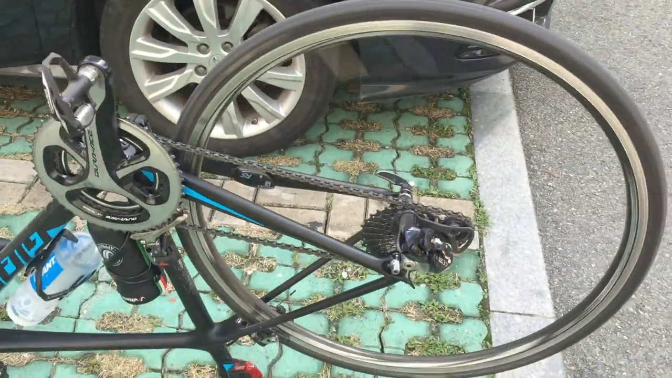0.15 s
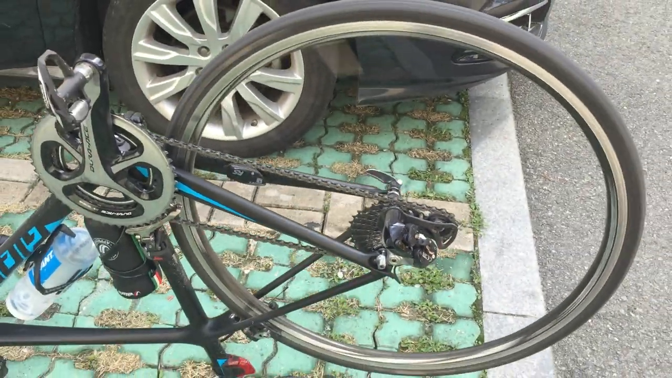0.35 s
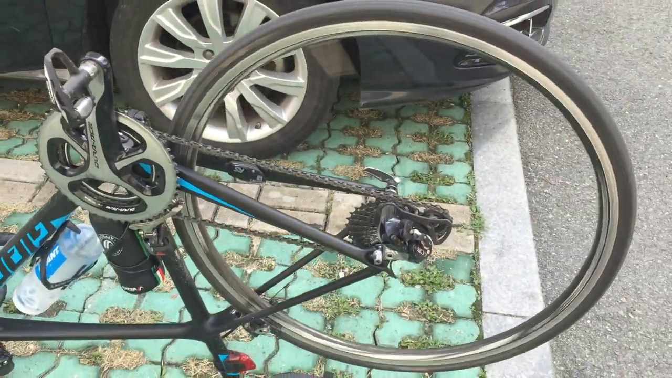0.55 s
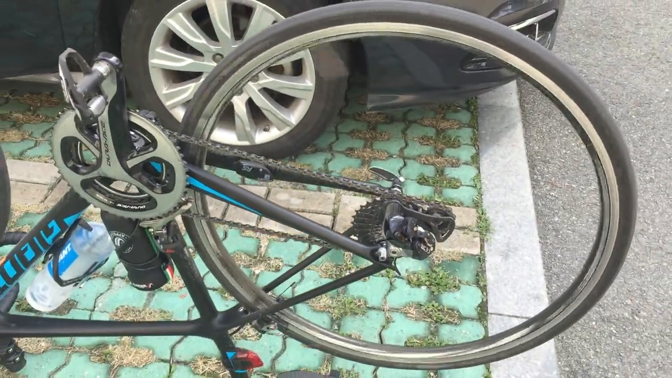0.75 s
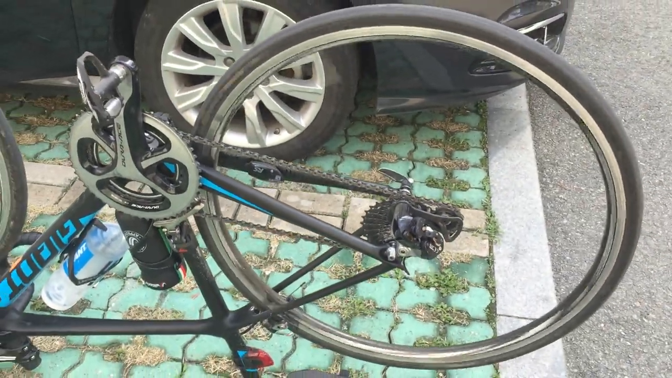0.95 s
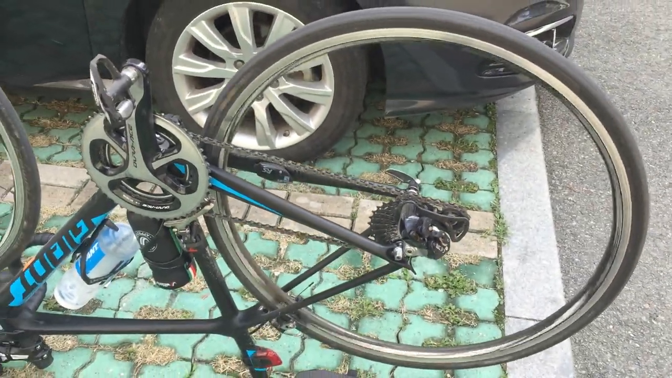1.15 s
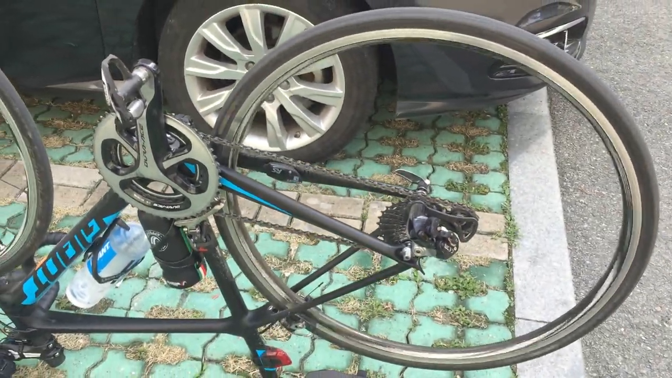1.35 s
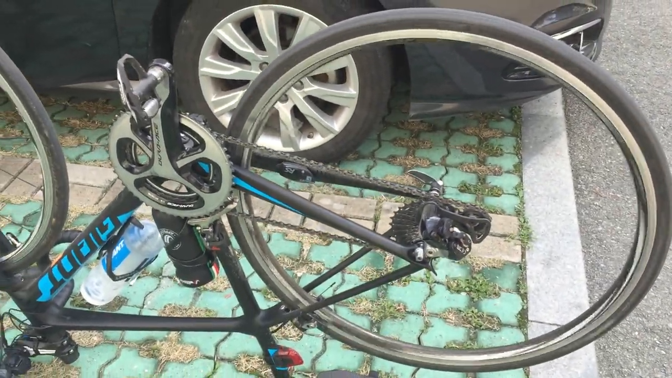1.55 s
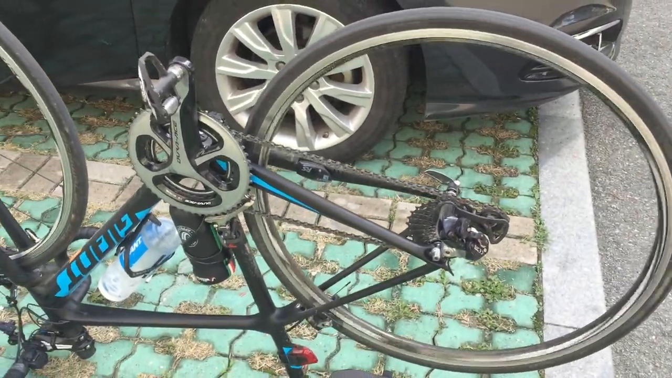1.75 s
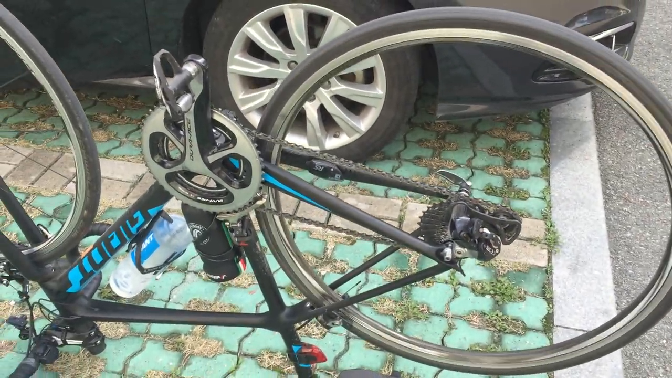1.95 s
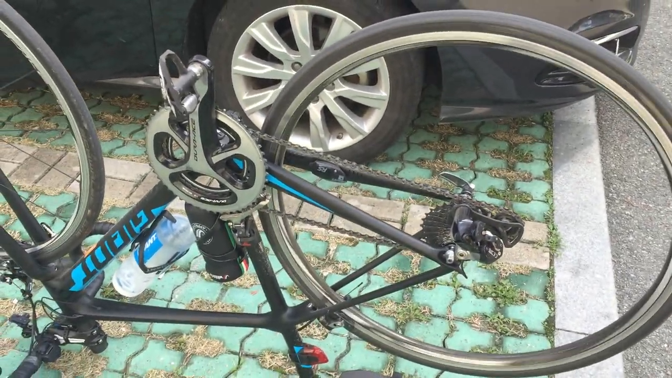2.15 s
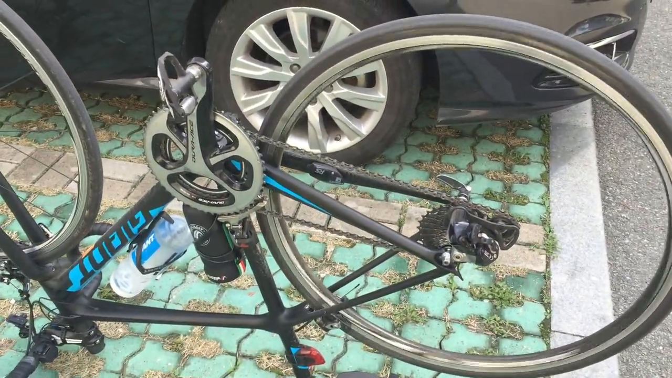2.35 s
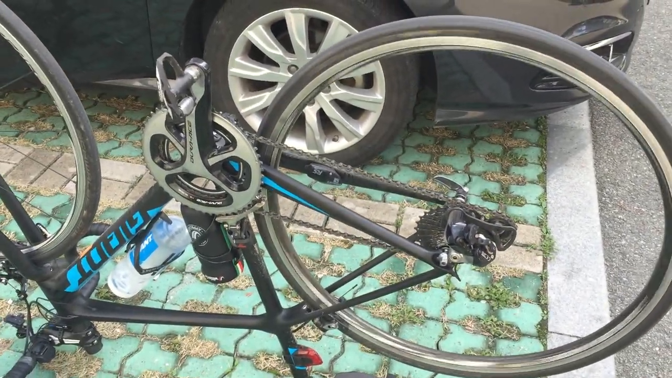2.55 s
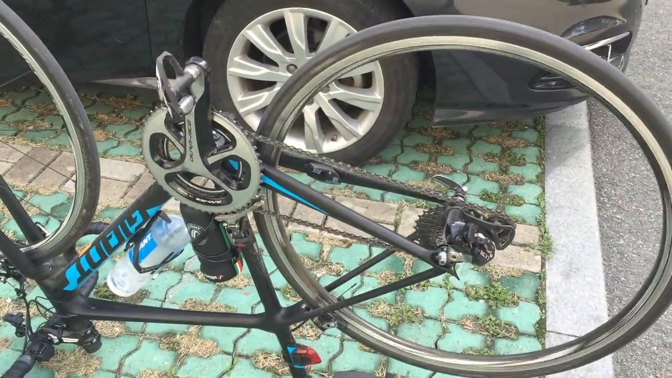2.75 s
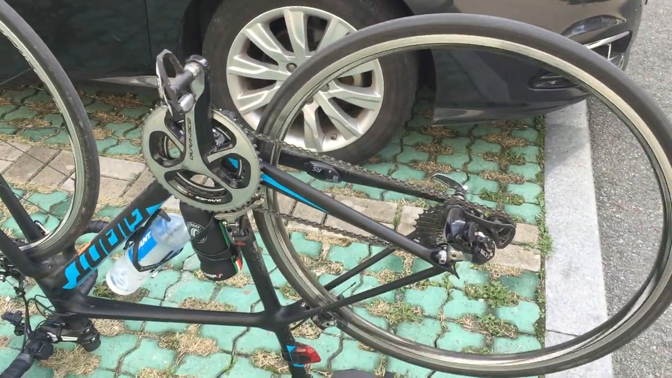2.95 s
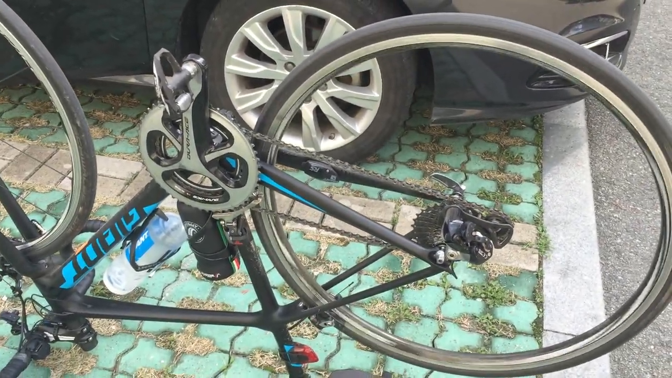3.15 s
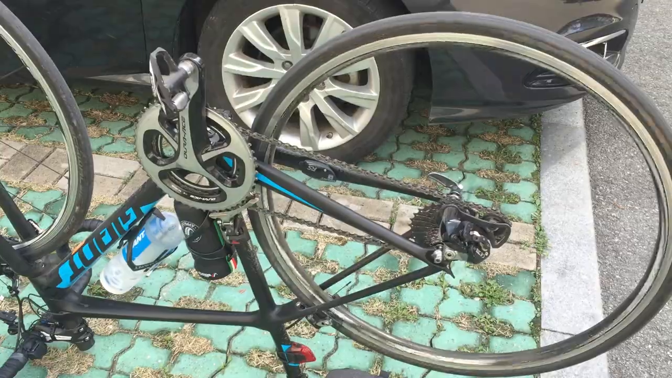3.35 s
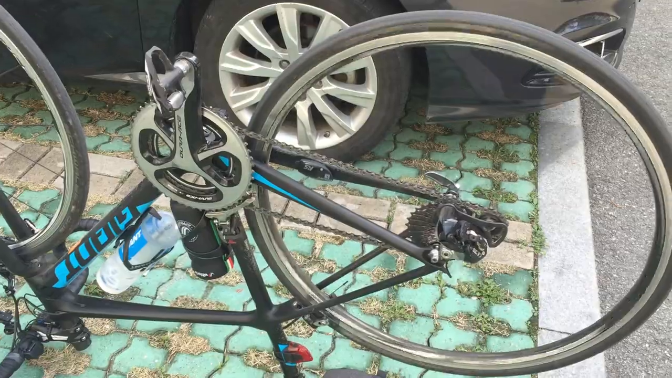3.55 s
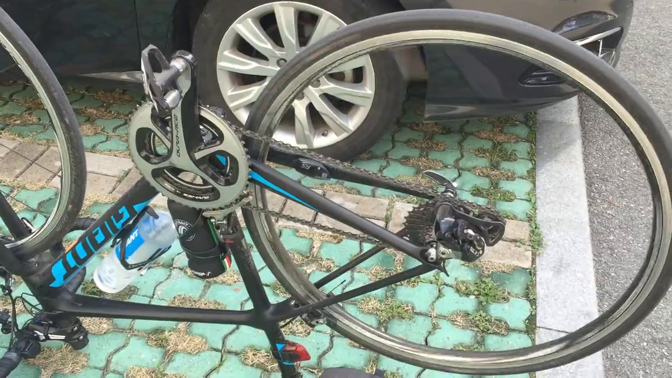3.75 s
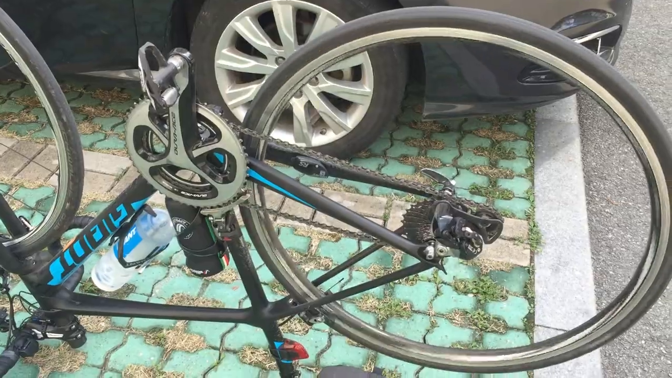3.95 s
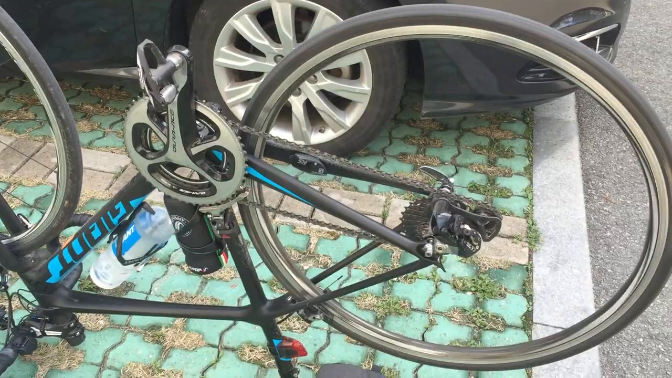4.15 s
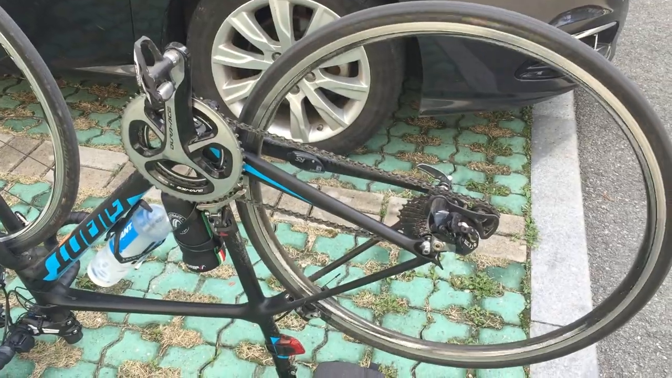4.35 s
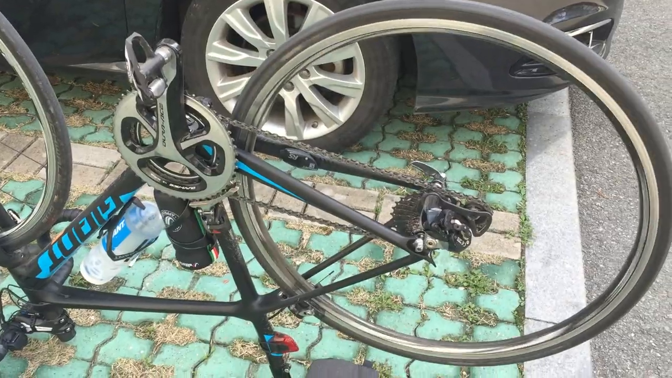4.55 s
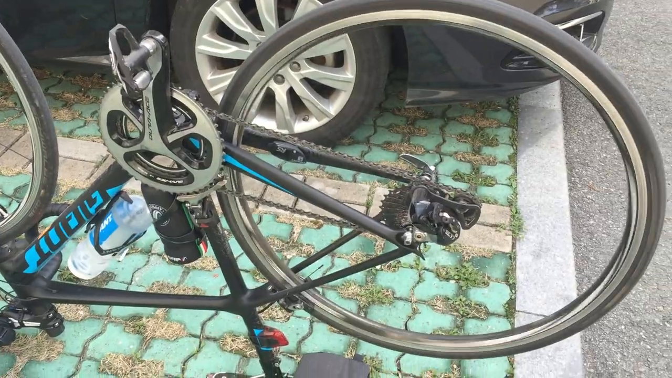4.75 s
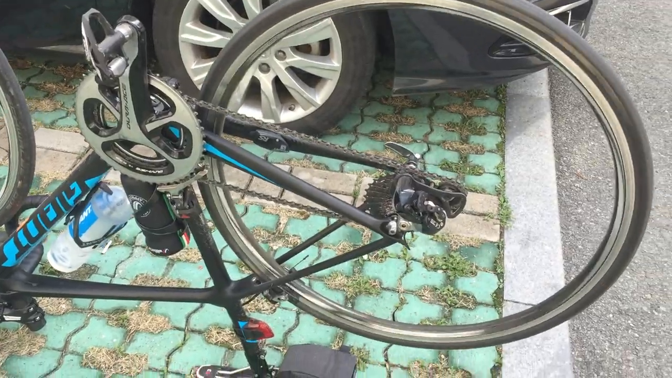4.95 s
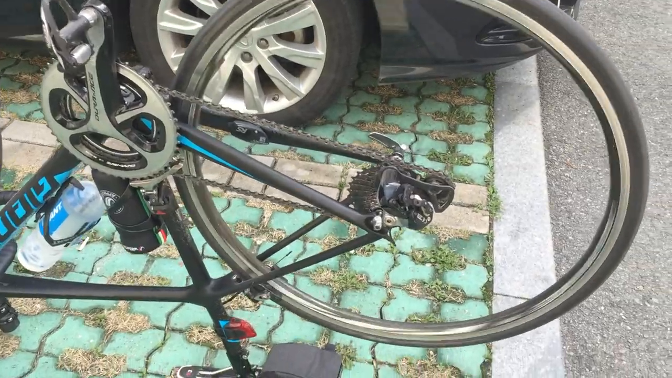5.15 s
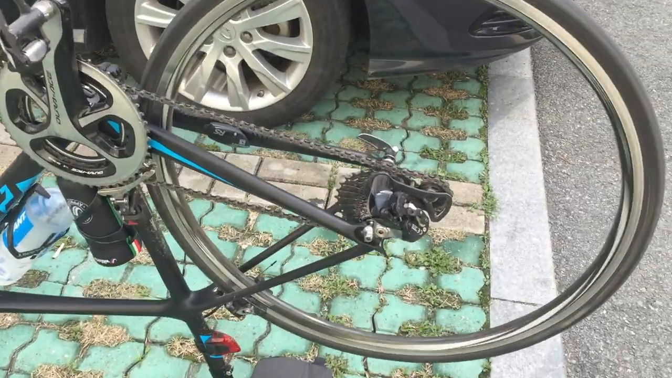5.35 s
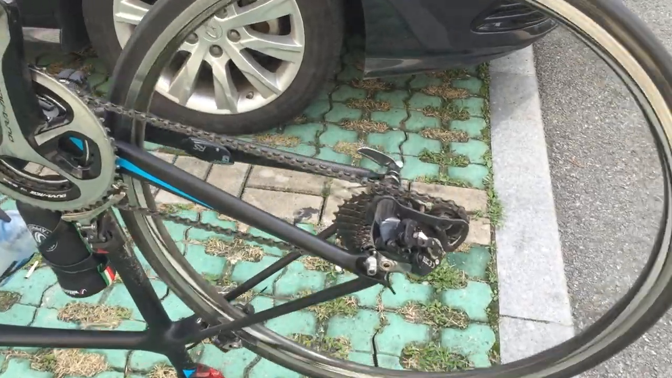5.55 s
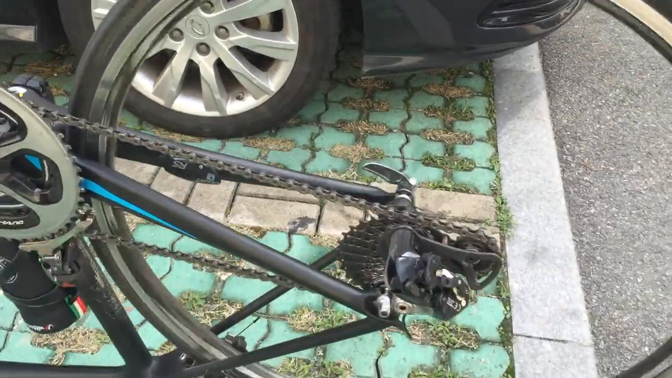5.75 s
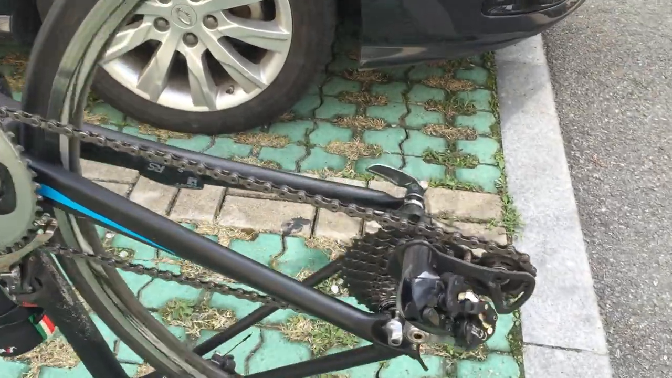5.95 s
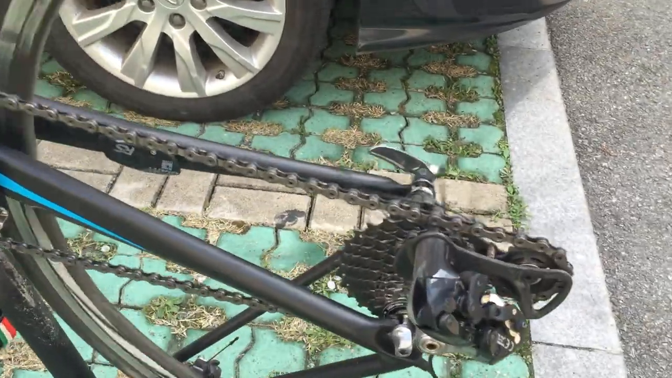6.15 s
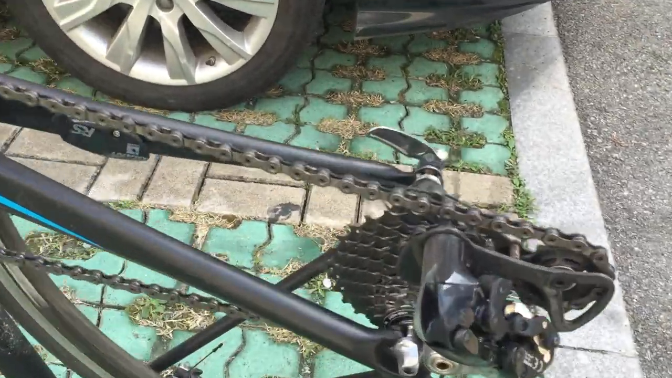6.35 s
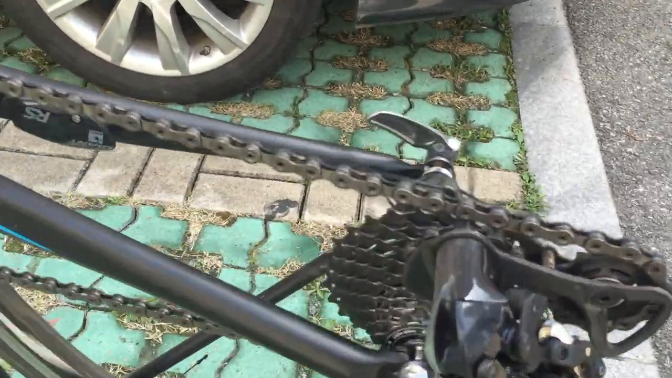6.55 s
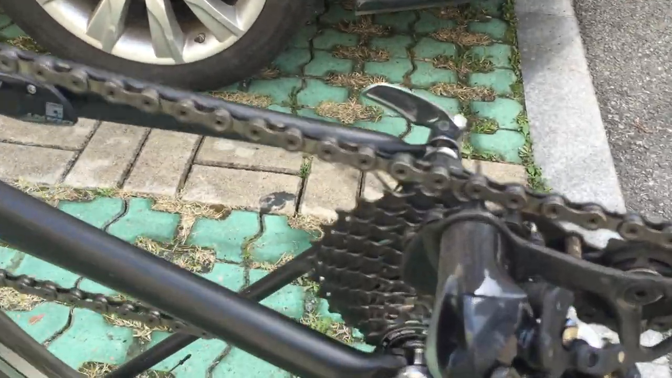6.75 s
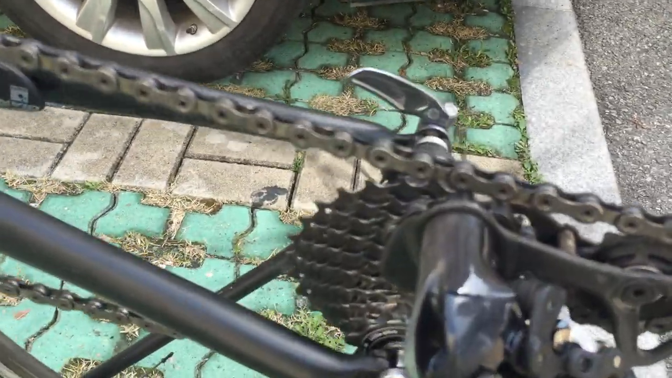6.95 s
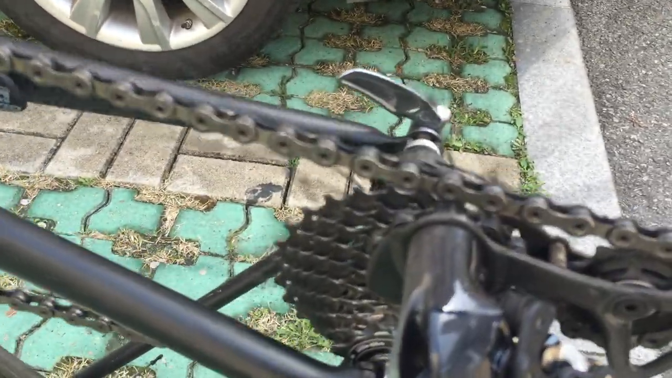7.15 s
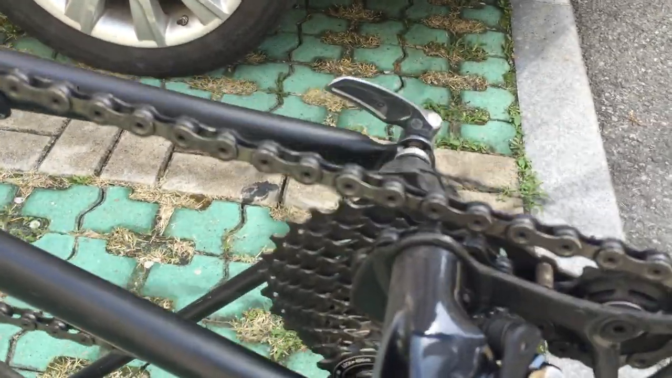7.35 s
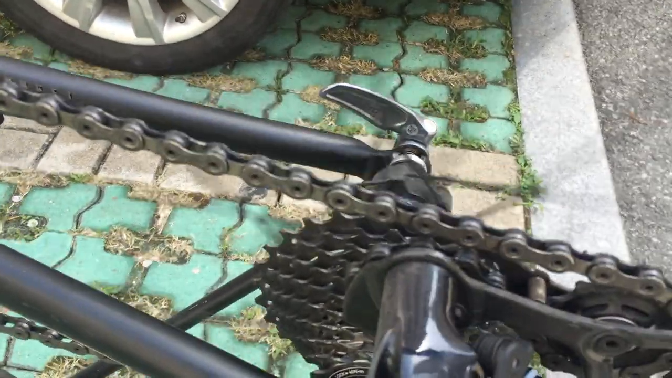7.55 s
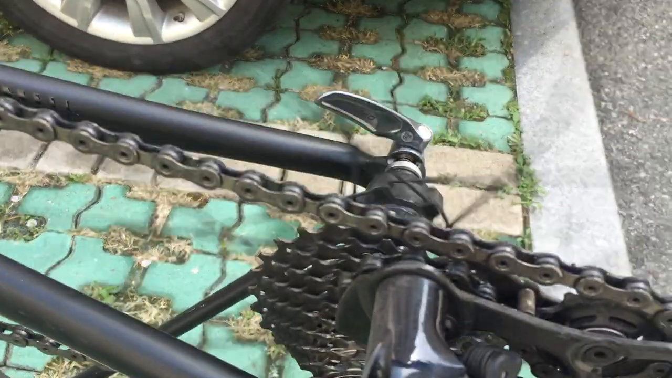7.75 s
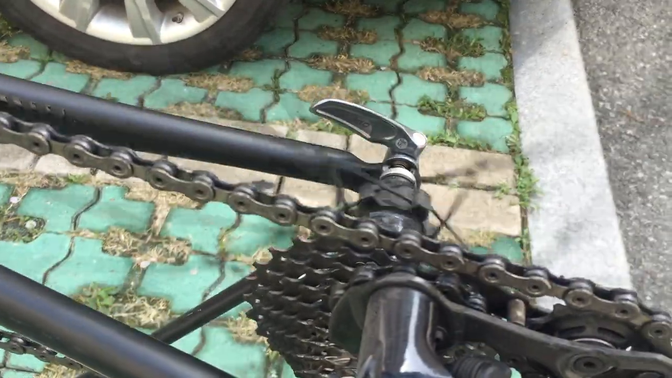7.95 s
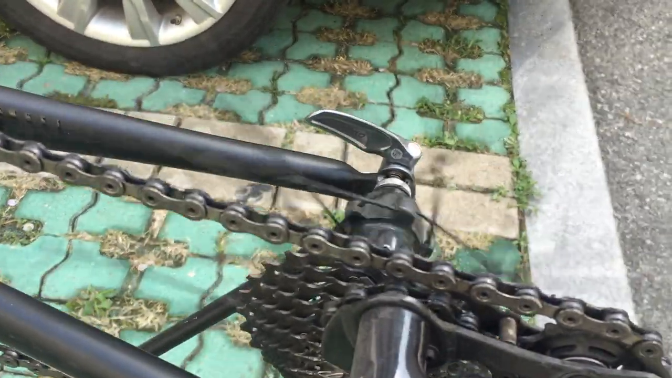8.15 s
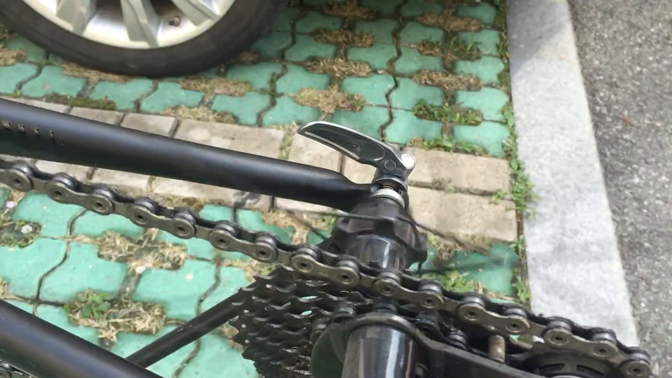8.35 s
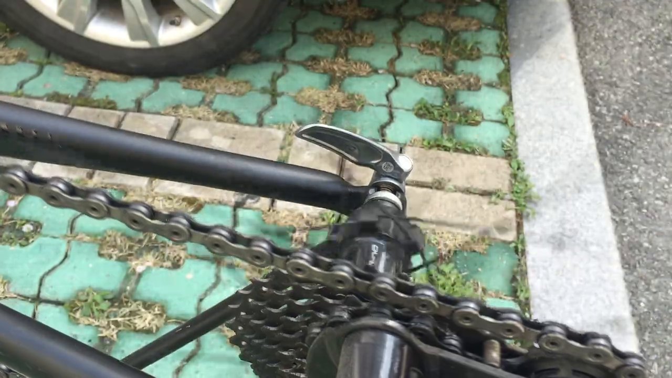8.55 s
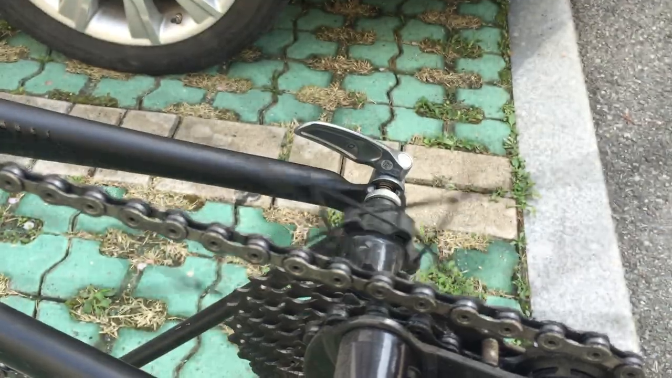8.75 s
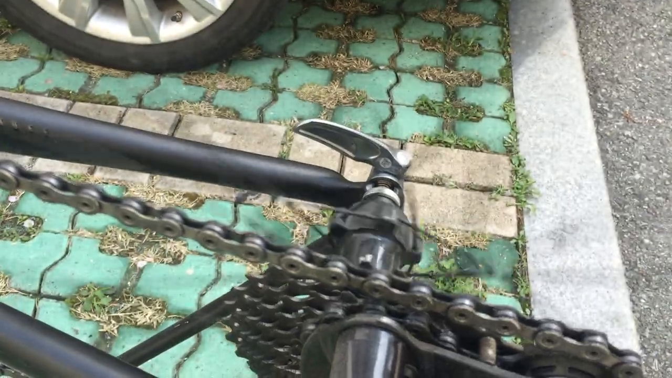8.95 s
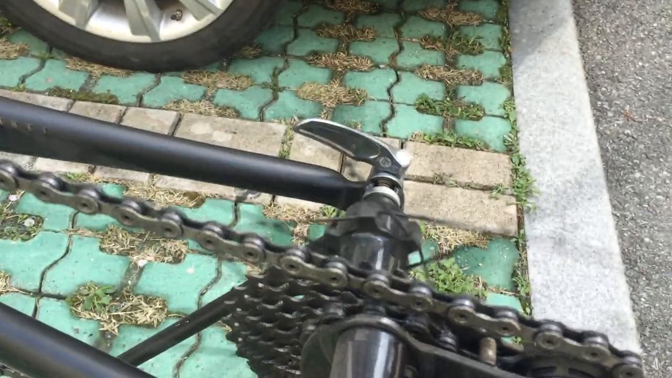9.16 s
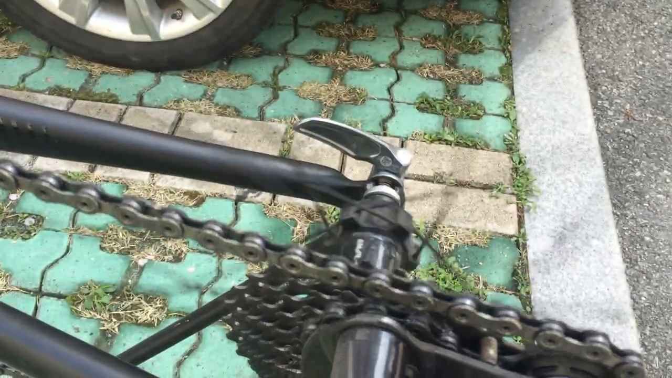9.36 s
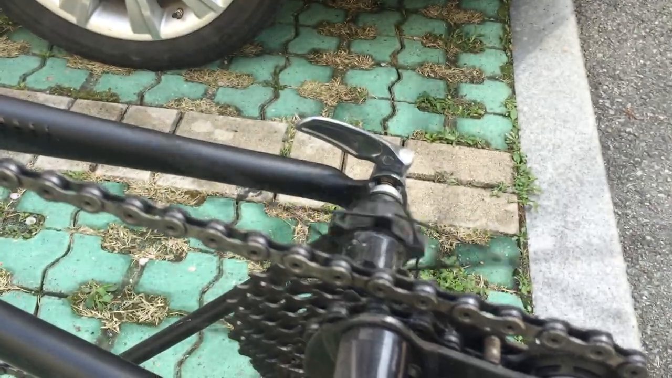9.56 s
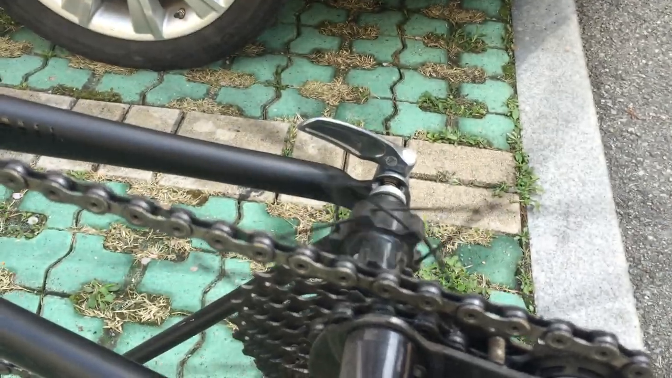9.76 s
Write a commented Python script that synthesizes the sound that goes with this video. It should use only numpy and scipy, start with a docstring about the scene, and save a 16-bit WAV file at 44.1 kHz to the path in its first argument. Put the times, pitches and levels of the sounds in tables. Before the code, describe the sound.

Fast metallic ratchet buzz of a coasting bicycle wheel outdoors, with light taps and wind thumps, nearing until individual clicks stand out crisply.

```python
"""A fast freehub buzz over a wheel drone, with a soft rasp that dies away early and a few light taps.
An upturned bicycle's rear wheel coasts and slows outdoors: pawls snap over 18 ratchet teeth, as noise bursts
that ring hub and sprockets. Snaps and bearing noise ring rim and frame into the drone; low tones throb each turn.
The microphone moves in on the hub, so single cracks stand out. Wind is filtered noise plus swinging eddies;
taps are decaying tones and noise; quiet coloured noise is the outdoor background."""
import sys
import numpy as np
from scipy import signal
from scipy.fft import rfft, irfft, next_fast_len
from scipy.io import wavfile
from scipy.ndimage import uniform_filter1d, map_coordinates

SR = 44100
rng = np.random.default_rng(int(sys.argv[2]) if len(sys.argv) > 2 else 0)


def digitize_waveform(pressure):
    """Quantize a signal to 16-bit integers and store it at the path in sys.argv[1].

    Rows of a 2-D input are taken as channels; values are limited to [-1, 1].
    """
    field = np.atleast_2d(pressure).T
    bounded = np.clip(field, -1, 1)
    quanta = np.round(bounded * 32767).astype(np.int16)
    wavfile.write(sys.argv[1], SR, quanta)


N = 436149


def amp(db):
    """Decibels to gain."""
    return 10 ** (np.asarray(db) / 20)


def unit(x):
    """x at rms 1."""
    return x / np.sqrt(np.mean(x ** 2) + 1e-20)


def along(points, hz):
    """(Hz, value) points read on a log frequency axis."""
    point_hz, value = np.transpose(points)
    return np.interp(np.log(hz + 1), np.log(point_hz), value)


def curve(rows):
    """(s, value) rows as one value per sample."""
    return np.interp(np.arange(N) / SR, *np.transpose(rows))


def wobble(knots_per_s):
    """A random curve, smooth between its knots."""
    knots = rng.standard_normal(int(N * knots_per_s / SR) + 4)
    return map_coordinates(knots, [np.arange(N) * knots_per_s / SR])


def resonance(hz, centre_hz, width_hz):
    """Bell over frequency: 1 at the centre, half at the edges of its width."""
    return 1 / (1 + (2 * (hz - centre_hz) / width_hz) ** 2)


def coloured(x, spectrum, resonances=(), size=8192):
    """x through a minimum-phase filter: broad spectrum plus ringing (Hz, width Hz, dB) resonances; rms 1."""
    hz = np.fft.rfftfreq(size, 1 / SR)
    db = along(spectrum, hz)
    db = db + sum(lift_db * resonance(hz, centre, width) for centre, width, lift_db in resonances)
    # folding the cepstrum makes the response causal
    cepstrum = irfft(np.log(amp(db)))
    cepstrum[1:size // 2] *= 2
    cepstrum[size // 2 + 1:] = 0
    response = irfft(np.exp(rfft(cepstrum)))
    return unit(signal.oaconvolve(x, response)[:N])


def treble_of(x, edge_hz):
    """The part of x above an edge, with no shift in time."""
    return signal.sosfiltfilt(signal.butter(2, edge_hz, "high", fs=SR, output="sos"), x)


def placed(times_s, sounds):
    """Each row of sounds laid down at its time."""
    index = np.round(np.asarray(times_s) * SR).astype(int)[:, None] + np.arange(sounds.shape[1])
    return np.bincount(np.maximum(index, 0).ravel(), sounds.ravel(), N)[:N]


# Outdoor background spectrum. Each row: frequency in Hz, relative level in dB.
AIR_SPECTRUM = [(20, -14), (60, -39), (150, -30), (300, -12), (800, -14.5), (1400, -7), (2000, -2.5),
                (2800, -4), (6000, -18.5), (15000, -19)]


def air(level_db=-56.5):
    """Quiet of the street: steady coloured noise."""
    return amp(level_db) * coloured(rng.standard_normal(N), AIR_SPECTRUM)


# Gusts that buffet the microphone. Each row: start in seconds, length in seconds, level in dB.
GUST_TIMES = [(2.9, 0.17, -66), (5.32, 0.031, -47), (5.488, 0.069, -40), (5.597, 0.23, -42),
              (6.137, 0.15, -33), (6.318, 0.11, -45), (6.8, .05, -51), (6.855, .26, -41), (7.17, 0.11, -54),
              (8.804, 0.054, -40)]
GUST_ATTACK_S, GUST_RELEASE_S = 0.0093, 0.02  # time constants


def gust_power():
    """Summed power of the gusts: each rises quickly, holds and dies away."""
    t = np.arange(N) / SR
    power = np.zeros(N)
    for start, length, db in GUST_TIMES:
        before = np.maximum(start - t, 0) / GUST_ATTACK_S
        after = np.maximum(t - start - length, 0) / GUST_RELEASE_S
        power += (amp(db) * np.exp(-np.minimum(before + after, 20))) ** 2
    return power


# Breeze rumble spectrum. Each row: frequency in Hz, relative level in dB.
BREEZE_SPECTRUM = [(15, -64), (30, -11), (50, 1.5), (75, 1.5), (110, 0), (170, -10.5), (300, -12),
                   (600, -35.5), (2000, -62)]
# Gust rumble spectrum. Each row: frequency in Hz, relative level in dB.
GUST_SPECTRUM = [(15, -50), (30, -21), (55, 3), (95, -2.5), (170, -6), (250, -18.5), (400, -24), (800, -40),
                 (2500, -60)]
# Breeze on the microphone. Each row: time in seconds, level in dB.
BREEZE_LEVEL_DB = [(0, -52.5), (1.3, -54), (2.1, -54.5), (2.6, -51.5), (3.1, -55), (3.8, -53), (4.1, -63.5),
                   (5.1, -55.5), (6.1, -45.5), (6.6, -56.5), (7.3, -54), (7.6, -61.5), (8.2, -58.5),
                   (8.6, -52), (9.2, -54), (9.89, -50)]


def wind(breeze_lumps_db=3, gust_lumps_db=5.5):
    """Lumpy rumble on the microphone between the eddies; the gusts reach higher than the breeze."""
    breeze = coloured(rng.standard_normal(N), BREEZE_SPECTRUM)
    breeze = unit(breeze * amp(breeze_lumps_db * wobble(20)))
    gust = coloured(rng.standard_normal(N), GUST_SPECTRUM)
    gust = unit(gust * amp(gust_lumps_db * wobble(30)))
    return amp(curve(BREEZE_LEVEL_DB)) * breeze + np.sqrt(gust_power()) * gust


# Single eddies thumping the microphone.
# Each row: envelope peak in seconds, envelope peak level in dB, starting frequency in Hz.
EDDIES = [(.469, -34, 78), (2.606, -40.5, 103), (2.941, -38, 89), (3.091, -39, 89), (3.88, -39.5, 151),
          (4.187, -34, 70), (5.33, -35.5, 112), (5.351, -34, 165), (5.371, -39, 67), (5.479, -30.5, 131),
          (5.511, -28, 132), (5.538, -34, 111), (5.554, -31, 190), (5.615, -29.5, 117), (5.701, -35, 102),
          (5.761, -40, 101), (5.823, -26, 84.5), (6.091, -38, 96), (6.157, -22, 140), (6.175, -30, 100),
          (6.203, -29.5, 182), (6.248, -16.5, 196), (6.264, -24, 217), (6.291, -28, 91), (6.341, -32, 91),
          (6.387, -30, 138), (6.442, -29.5, 92.5), (6.878, -33, 91), (6.9, -26, 93), (6.933, -28, 107),
          (6.976, -24.5, 132), (7.051, -30, 101), (7.103, -26.5, 90), (7.22, -36, 82), (7.278, -38.5, 102),
          (8.758, -39, 91.5), (8.814, -40, 82), (8.847, -28.5, 170), (9.065, -47, 85), (9.226, -34.5, 94),
          (9.43, -35, 80.5), (9.596, -38, 75), (9.875, -34, 92)]


def puffs(peak_cycles=1.0, sag=0.1, steep=0.85, size=4000):
    """An eddy swings the pressure a few times, slowing as it dies; strong ones have steep fronts."""
    peak_s, db, hz = np.transpose(EDDIES)
    cycles = hz[:, None] * np.arange(size) / SR
    envelope = (cycles / peak_cycles * np.exp(1 - cycles / peak_cycles)) ** 3
    phase = 2 * np.pi * np.log1p(sag * cycles) / sag
    skew = steep * np.sqrt(amp(db - db.max()))[:, None] * envelope
    swing = np.sin(phase + skew * np.sin(phase))
    return placed(peak_s - peak_cycles / hz, amp(db[:, None]) * envelope * swing)


# Light taps. Each row: start in seconds, peak level in dB, main mode in Hz.
TAP_EVENTS = [(0.101, -34, 480), (1.079, -34, 360), (2.249, -39, 380), (2.294, -31.5, 1270),
              (5.6672, -21, 1160), (6.389, -29.5, 850)]


def taps(t60_s=0.008, attack_s=0.00062, ring_ratio=.84, ring_db=-25, ring_t60_s=.07,
         crack_db=-8, crack_t60_s=.012, crack_hz=2600,
         scatter_db=-17, scatter_t60_s=0.12, scatter_hz=1200, size=4000):
    """A dry knock: a short main mode, a faint lower ring, a bright crack and scatter from the surroundings."""
    start_s, db, hz = np.transpose(TAP_EVENTS)
    t = np.arange(size) / SR
    phase = 2 * np.pi * hz[:, None] * t

    def noise(centre_hz):
        """Noise through one wide resonance."""
        return signal.lfilter(*signal.iirpeak(centre_hz, 1, fs=SR), rng.standard_normal(phase.shape))

    tap = np.sin(phase) * amp(-60 * t / t60_s)
    tap += np.sin(ring_ratio * phase) * amp(ring_db - 60 * t / ring_t60_s)
    tap += noise(crack_hz) * amp(crack_db - 60 * t / crack_t60_s)
    tap += noise(scatter_hz) * amp(scatter_db - 60 * t / scatter_t60_s)
    tap *= 1 - np.exp(-(t / attack_s) ** 2)
    return placed(start_s, amp(db[:, None]) * tap / np.abs(tap).max(axis=1, keepdims=True))


START_TEETH_PER_S, FRICTION_TEETH_PER_S2, DRAG_PER_S = 91.402, .2352, .033


def speed():
    """Teeth a second: bearing friction takes a steady toll, air drag one that grows with speed."""
    friction = FRICTION_TEETH_PER_S2 / DRAG_PER_S
    return (START_TEETH_PER_S + friction) * np.exp(-DRAG_PER_S * np.arange(N) / SR) - friction


# The microphone moves in on the hub. Each row: time in seconds, distance in m.
HUB_DISTANCE_M = [(0, 0.9), (5, 0.76), (5.7, 0.57), (6.25, 0.43), (6.7, 0.26), (7.5, 0.26), (8.7, 0.31),
                  (9.89, 0.3)]
START_TOOTH, SOUND_M_PER_S = .72, 343
CROSSOVER_M, CROSSOVER_POWER = 0.51, 6.6  # distance of equal shares, abruptness


def teeth_passed():
    """Wheel angle counted in ratchet teeth, as the sound reaches the microphone after its travel time."""
    teeth_per_s = speed()
    travel_s = curve(HUB_DISTANCE_M) / SOUND_M_PER_S
    return START_TOOTH + np.cumsum(teeth_per_s) / SR - teeth_per_s * travel_s


def closeness():
    """Share of direct over reflected sound: towards 0 from afar, towards 1 close up."""
    return 1 / (1 + (curve(HUB_DISTANCE_M) / CROSSOVER_M) ** CROSSOVER_POWER)


def approach(far, close):
    """The sound from afar gives way to the sound close up, shares adding in power."""
    share = closeness()
    return np.sqrt(1 - share) * far + np.sqrt(share) * close


def swell(depth_db, lead_turns=0.032, peaked=0.23):
    """A gain that rises to a brief peak twice in each turn of the wheel."""
    angle = 2 * np.pi * 2 * (teeth_passed() / len(TOOTH_DB) + lead_turns)
    return amp(depth_db * (np.cos(angle) + peaked * np.cos(2 * angle)))


# Rasp spectrum. Each row: frequency in Hz, relative level in dB.
RASP_SPECTRUM = [(100, -25), (400, -17), (600, -0.5), (1350, -0.5), (1800, -10.5), (2900, -15), (4000, -12),
                 (9000, -9)]
RASP_START_DB, RASP_FADE_DB_PER_S, RASP_STOP_S, RASP_RELEASE_S = -47.5, 2, 2.37, 0.11


def rasp(rough_db=2):
    """Uneven drivetrain rubbing that comes and goes with the wheel, fades slowly, then dies away fast."""
    t = np.arange(N) / SR
    level = amp(RASP_START_DB - RASP_FADE_DB_PER_S * t)
    level = level * np.exp(-np.maximum(t - RASP_STOP_S, 0) / RASP_RELEASE_S)
    roughness = amp(rough_db * wobble(38.5))
    return level * roughness * swell(depth_db=0.5) * coloured(rng.standard_normal(N), RASP_SPECTRUM)


# Low throbs at fixed places in every turn.
# Each row: place in teeth, mean frequency in Hz, half length (to 1/e) in seconds, relative level in dB.
THROB_PLACES = [(1.6, 630, 0.022, -4.5), (7.05, 559, 0.013, -2.5), (9.6, 604, 0.014, -5),
                (9.8, 950, 0.0074, -5.5), (16, 569, .012, 0), (16.1, 1000, 0.015, -8)]
# Strength of the throbs, added to their relative levels. Each row: time in seconds, level in dB.
THROB_STRENGTH_DB = [(0, -41.5), (1.4, -42), (2.2, -45), (2.6, -52), (5, -47.5), (9.89, -59.5)]


def throbs(scatter_db=2, pitch_scatter=.012, size=4000):
    """At the same places in every turn the wheel swells briefly on one of its low resonances."""
    passed, level_db = teeth_passed(), curve(THROB_STRENGTH_DB)
    t = (np.arange(size) - size / 2) / SR
    out = np.zeros(N)
    for tooth, hz, half_s, db in THROB_PLACES:
        index = np.searchsorted(passed, np.arange(tooth, passed[-1], len(TOOTH_DB)))
        level, pitch, phase = rng.standard_normal((64, 3))[:len(index)].T[:, :, None]
        tone = np.sin(2 * np.pi * (hz * (1 + pitch_scatter * pitch) * t + phase))
        gain = amp(db + level_db[index, None] + scatter_db * level)
        out += placed(index / SR + t[0], gain * np.exp(-(t / half_s) ** 2) * tone)
    return out


# Resonances of rim and frame.
# Each row: frequency in Hz, width in Hz, lift from afar in dB, lift close up in dB.
FRAME_MODES = [(198, 27, 0, 16), (406, 83, -2, 14), (520, 19, 2, 8), (575, 110, 12, 15), (637, 45, 8, -8),
               (787.7, 58, 9, 10.5), (850, 45, 2, 9.5), (935.6, 47, 16, 17), (1004, 80, 6.5, 3.5),
               (1234, 27, 11, 14), (1825, 70, 14.5, 12), (2120, 20, 4, 22), (2412, 87, 16.5, 5)]
# Drone spectrum under those resonances. Each row: frequency in Hz, relative level in dB.
DRONE_SPECTRUM = [(100, -16), (240, -20.5), (330, -5), (450, -2.5), (700, 3), (1100, 1), (1500, -1.5),
                  (2200, -3.5), (4000, -14), (9000, -48.5)]
# level from afar at the starting speed, power of speed it follows, extra level close up
DRONE_DB, DRONE_SPEED_POWER, DRONE_CLOSE_DB = -48.5, 2.42, 5


def wheel(bearings=0.55):
    """Snaps and rolling bearings shake rim and frame into a smeared drone, which swells twice a turn."""
    modes = np.array(FRAME_MODES)
    knocks = snaps(crack_t60_s=0.096, ring_db=-10, ring_t60_s=0.094, echo_db=5.5, echo_s=0.0048,
                   tail_db=4.5, tail_t60_s=0.45, alike=0.77, fresh=0.38, early_s=0,
                   accent=0.44, top_accent=0.9, drift_db=2.0)
    drive = unit(knocks) + bearings * rng.standard_normal(N)
    drive = drive * swell(depth_db=0.5)
    far = coloured(drive, DRONE_SPECTRUM, modes[:, :3])
    close = coloured(drive, DRONE_SPECTRUM, np.delete(modes, 2, axis=1))
    level = amp(DRONE_DB + DRONE_CLOSE_DB * closeness())
    level = level * (speed() / START_TEETH_PER_S) ** DRONE_SPEED_POWER
    return level * approach(far, close)


def chatter(shape, count, spiky_db=1.5):
    """Spectra of bursts of tiny uneven contacts."""
    contacts = rng.standard_normal((count, len(shape)))
    contacts = contacts * amp(spiky_db * rng.standard_normal((count, len(shape))))
    return rfft(contacts * shape)


def evened(spectra, bins=21):
    """Each burst with its energy spread evenly over frequency."""
    return spectra / np.sqrt(np.abs(uniform_filter1d(np.abs(spectra) ** 2, bins, axis=1)))


# Ratchet teeth in the order of one turn, before accent scaling.
# Each row: thud, clack, clink, ring, ping, tick and sizzle, all in dB, at the band centres below.
TOOTH_DB = [(2.0, 2.9, 3.0, 1.3, 1.9, 0.1, -0.4), (1.3, 1.6, 5.6, -1.0, 1.5, 2.7, 0.8),
            (1.6, 0.5, 1.3, -3.4, -1.3, 2.8, -0.2), (-1.8, -0.8, -0.0, 0.2, -2.3, 0.9, 0.1),
            (-1.7, -1.1, -3.0, -1.4, -1.1, 1.4, -0.5), (-3.4, -0.2, -0.5, 4.2, -0.8, 0.9, -0.8),
            (-1.7, -0.1, -1.1, -0.8, -0.5, -2.2, 0.6), (1.6, -1.8, -1.1, -0.6, 1.0, -3.1, 0.2),
            (2.3, 0.9, -0.8, 0.6, 0.1, 0.0, -1.2), (0.8, -2.4, -0.1, -0.5, 0.8, 1.3, -0.4),
            (0.3, -3.1, -1.2, -1.1, -2.1, -2.1, -0.1), (-3.3, -1.2, -3.6, -4.7, -4.5, -0.8, -0.2),
            (-3.0, 2.8, 1.6, 0.8, 1.7, -0.8, 0.8), (-2.5, 1.2, -1.2, 1.6, 4.5, 0.1, 0.4),
            (-0.6, -2.3, -0.7, 1.3, 2.3, 1.4, 0.4), (1.3, -0.9, -1.3, -1.3, -1.9, -1.4, 0.7),
            (3.5, 3.4, 0.3, 2.1, -0.5, 0.1, 0.3), (3.2, 0.5, 2.9, 2.8, 1.3, -1.1, -0.5)]
# Centres of those seven bands. Each entry: frequency in Hz.
TOOTH_CENTRES_HZ = [600, 3050, 3750, 4500, 5700, 7000, 11000]
# Teeth ringing with a note of their own, before far and close scaling.
# Each row: tooth index, frequency in Hz, lift from afar in dB, lift close up in dB.
TOOTH_NOTES = [(0, 2930, 0, 5), (0, 3950, 4, 4), (1, 3700, 5.5, 5), (1, 6460, 1, 3), (2, 7450, 5, 1),
               (2, 7020, 0, 2.5), (3, 4480, 5, 0), (4, 6600, 4, 1), (5, 4480, 1, 8), (8, 4260, 6, 1),
               (9, 5860, 4, 0), (11, 7840, 5, 0), (12, 3370, 4, 2), (12, 4820, 4, 1), (13, 5680, 3, 3),
               (13, 4220, 0, 4), (16, 2970, 0, 5), (16, 4560, 0, 6), (17, 3620, 3.5, 0), (17, 4270, 4, 4),
               (17, 5470, 5, 0)]
NOTE_WIDTH_HZ = 340


def tooth_colours(number, hz, accent, top_accent, drift_db, far_notes, close_notes, fresh=0.13):
    """Gain over frequency per snap: its tooth's colour, drifting by turns as the pawls seat differently."""
    turn, tooth = number // len(TOOTH_DB), number % len(TOOTH_DB)
    chance = rng.standard_normal((turn[-1] + 1, len(TOOTH_DB), len(TOOTH_CENTRES_HZ)))
    drift = unit(uniform_filter1d(chance, size=4, axis=0) + fresh * chance)
    db = accent * np.array(TOOTH_DB)[tooth] + drift_db * drift[turn, tooth]
    db[:, -1] *= top_accent
    notes_db = 0
    for which, centre, far_db, close_db in TOOTH_NOTES:
        lift_db = far_notes * far_db + close_notes * close_db
        notes_db = notes_db + np.outer(tooth == which, lift_db * resonance(hz, centre, NOTE_WIDTH_HZ))
    broad_db = np.array([along(np.c_[TOOTH_CENTRES_HZ, row], hz) for row in db])
    return amp(broad_db + notes_db)


SNAP_SCATTER_DB = 0.62


def snaps(crack_t60_s, ring_db, ring_t60_s, echo_db, echo_s, tail_db, tail_t60_s, alike, fresh, early_s,
          accent, top_accent, drift_db, far_notes=0, close_notes=0, size=1500):
    """One snap per tooth: crack, ring, tail and paving echo; a part of its rattle repeats every turn."""
    passed = teeth_passed()
    number = np.arange(1, int(passed[-1]) + 1)
    times_s = np.interp(number, passed, np.arange(N) / SR)
    tooth = number % len(TOOTH_DB)
    lead_s = .002
    since_s = np.arange(size) / SR - lead_s
    t = np.maximum(since_s, 0)
    crack = amp(-60 * t / crack_t60_s)
    ring = amp(ring_db - 60 * t / ring_t60_s)
    echo = amp(echo_db - 60 * np.abs(t - echo_s) / crack_t60_s) * (t > echo_s)
    tail = amp(tail_db - 60 * t / tail_t60_s)
    # the pawl scrapes over the edge just before it lands
    rise = np.exp(np.minimum(since_s, 0) / .0003)
    shape = np.sqrt(crack ** 2 + ring ** 2 + echo ** 2 + tail ** 2) * rise
    rattle = chatter(shape, len(TOOTH_DB))[tooth]
    # the share common to all teeth gives the buzz its pitch
    rattle = rattle + alike * chatter(shape, 1) + fresh * chatter(shape, len(times_s))
    hz = np.fft.rfftfreq(size, 1 / SR)
    colour = tooth_colours(number, hz, accent, top_accent, drift_db, far_notes, close_notes)
    strength = amp(SNAP_SCATTER_DB * rng.standard_normal((len(times_s), 1)))
    return placed(times_s - lead_s - early_s, strength * irfft(evened(rattle) * colour, size))


# The hub's treble beam, crossed by the microphone. Each row: time in seconds, treble gain in dB.
BEAM_DB = [(0, 3), (2.5, 4), (5, 2), (6.7, 0.5), (7.7, 0), (8.6, 3), (9.89, 2)]


def beamed(x, edge_hz=11000):
    """The top treble rises and falls as the microphone moves through the hub's beam."""
    return x + (amp(curve(BEAM_DB)) - 1) * treble_of(x, edge_hz)


# Resonances of hub and sprockets.
# Each row: frequency in Hz, width in Hz, lift from afar in dB, lift close up in dB.
STEEL_MODES = [(1818, 109, 8.8, 10.0), (2080, 101, 2.4, 8.4), (2216, 56, 3.3, 7.1), (2440, 264, 8.8, 4.1),
               (2656, 67, 7.0, 4.1), (3007, 201, 4.0, 7.6), (3375, 480, 8.1, 6.8), (3844, 480, 5.2, 1.1),
               (4286, 480, 7.5, 7.4), (4596, 480, 5.9, 4.0), (5170, 480, 0.7, 0.6), (5695, 480, 1.9, 7.0),
               (6270, 289, 0.6, 0.4), (6501, 259, 5.4, 5.0), (6817, 175, 11.6, 7.8), (7328, 404, 7.6, 5.4),
               (7640, 201, 2.6, 3.0), (8159, 72, -1.1, 5.2), (8387, 144, 2.0, 2.4), (8818, 118, 1.2, -1.4),
               (9214, 111, -0.1, 4.7), (9593, 468, 8.2, 7.4), (10004, 191, 7.7, 2.5),
               (10932, 337, 3.3, 4.8), (11442, 480, 5.7, 7.4), (12200, 480, 2.5, 5.9),
               (12475, 207, 7.1, 5.8), (13005, 319, 7.1, 4.4), (13230, 480, 1.3, 2.9),
               (13767, 447, 5.3, 8.3), (14243, 279, 5.9, 7.6), (14438, 133, 6.9, 4.0),
               (14808, 389, 3.2, 2.8), (15454, 158, 5.3, 5.4), (15649, 273, 2.2, 6.4)]
# Snap spectrum from afar, under those resonances. Each row: frequency in Hz, relative level in dB.
FAR_SPECTRUM = [(100, -35), (600, -18), (1400, -5.5), (2000, -14.5), (2800, -12.5), (5000, -8.5),
                (8000, -4), (12000, -7), (15800, -2)]
# Snap spectrum close up, under those resonances. Each row: frequency in Hz, relative level in dB.
CLOSE_SPECTRUM = [(100, -44.5), (400, -3), (1000, -23.5), (1400, -12), (2000, -9.5), (2800, -8.5),
                  (5000, -8.5), (8000, 1), (12000, -0.5), (15800, 1.5)]
HUB_DB_AT_1M = -44  # before beam and band changes


def freehub(sizzle_hz=9500):
    """From afar the ratchet is a smeared buzz; close up each crack stands out, and only its top sizzles on."""
    modes = np.array(STEEL_MODES)
    far = snaps(crack_t60_s=0.018, ring_db=-13, ring_t60_s=0.03, echo_db=-17, echo_s=0.0052,
                tail_db=-11, tail_t60_s=0.11, alike=0.61, fresh=0.55, early_s=-.0002,
                accent=0.89, top_accent=0.45, drift_db=1.5, far_notes=0.67)
    crack = snaps(crack_t60_s=0.013, ring_db=-10, ring_t60_s=0.039, echo_db=-18, echo_s=0.0043,
                  tail_db=-18, tail_t60_s=0.11, alike=0.64, fresh=0.42, early_s=.0002,
                  accent=0.7, top_accent=0.51, drift_db=1.93, close_notes=0.89)
    sizzle = snaps(crack_t60_s=0.0093, ring_db=-9.5, ring_t60_s=0.045, echo_db=-22, echo_s=0.0043,
                   tail_db=-19, tail_t60_s=0.068, alike=0.78, fresh=0.43, early_s=.0002,
                   accent=0.62, top_accent=0.51, drift_db=1.5)
    # above the edge the sizzle replaces the crack
    close = unit(crack) + treble_of(unit(sizzle) - unit(crack), sizzle_hz)
    far = coloured(far, FAR_SPECTRUM, modes[:, :3])
    close = coloured(close, CLOSE_SPECTRUM, np.delete(modes, 2, axis=1))
    return amp(HUB_DB_AT_1M) / curve(HUB_DISTANCE_M) * beamed(approach(far, close))


# Narrow bands of the bicycle's sound that grow stronger or weaker for a while.
# Each row: middle in seconds, length in seconds, frequency in Hz, width in Hz, gain at the middle in dB.
BAND_CHANGES = [(0.205, .9, 11950, 200, 5), (.2, .9, 13500, 300, 4), (.3, 1.2, 1820, 129.6, -7),
                (.35, 1, 2530, 110, 1), (.35, 1, 3000, 101.9, 6), (.4, 1.1, 3150, 140, -8),
                (.4, 1.4, 8300, 1100, -2), (.5, 1.6, 1670, 130, 3.5), (1, 2.6, 2380, 100, -7.5),
                (1.1, 2.2, 2240, 70, 5), (1.9, 7.3, 2830, 166.7, -14), (2, 2.9, 780, 100, 2),
                (2.4, 2.1, 3800, 54.63, 3), (3.84, 1.3, 1820, 84, 2.5), (4.1, 3.5, 1270, 80, -8),
                (5.4, 1.7, 5300, 350, -4), (5.7, .9, 7200, 220, 6), (5.66, 1.5, 2200, 65.74, 7),
                (5.94, 2.1, 6250, 200, 3.5), (6.2, 0.83, 3430, 490, 3.5), (6.3, 3.2, 2820, 81, -24),
                (6.4, 1, 14250, 350, -3), (6.802, 0.91, 876, 100, 2), (6.8, .9, 5620, 250, -3),
                (6.9, 1.4, 4600, 350, 0), (7.1, 1.5, 11500, 300, -3), (7.3, 1.2, 1360, 300, -5),
                (7.45, 1.2, 4630, 220, 2), (8.732, 0.56, 939, 22, 5), (9.14, 1.8, 7000, 850, -2),
                (9.3, 1.2, 11480, 200, 1.5), (9.4, 1.6, 17000, 405, 7), (9.5, 1.4, 2630, 120, 3.5),
                (9.5, 2.2, 1310, 300, -1.5)]


def shifting_bands(x):
    """Each change smoothly lifts or lowers one narrow band, then lets it return."""
    t = np.arange(N) / SR
    for middle, length, hz, width, db in BAND_CHANGES:
        course = np.exp(-(2 * np.abs(t - middle) / length) ** 4)
        band = signal.lfilter(*signal.iirpeak(hz, hz / width, fs=SR), x)
        x = x + (amp(db * course) - 1) * band
    return x


def scene():
    """The outdoor background, the wind, the taps and the bicycle."""
    surroundings = air() + wind() + puffs() + taps()
    bicycle = shifting_bands(rasp() + wheel() + freehub()) + throbs()
    return (surroundings + bicycle)[None]


TOP_HZ = 15850


def record(dry, low_cut_hz=32):
    """The microphone sheds the deepest rumble and keeps nothing above its band limit."""
    thinned = signal.sosfilt(signal.butter(3, low_cut_hz, "high", fs=SR, output="sos"), dry)
    size = next_fast_len(N + SR // 2)
    # linear slope 100 Hz wide, centred on the limit
    keep = np.clip((TOP_HZ - np.fft.rfftfreq(size, 1 / SR)) / 100 + .5, 0, 1)
    return irfft(rfft(thinned, size) * keep, size)[:, :N]


dry = scene()
out = record(dry)
digitize_waveform(out)
```